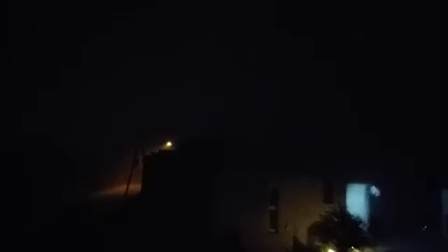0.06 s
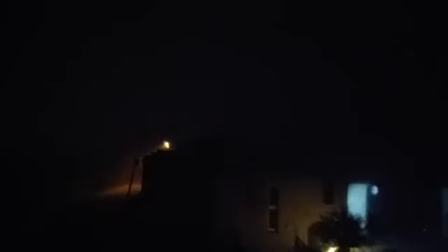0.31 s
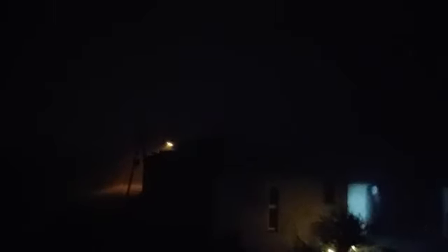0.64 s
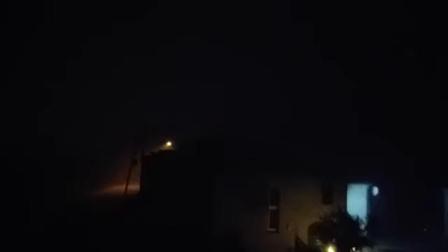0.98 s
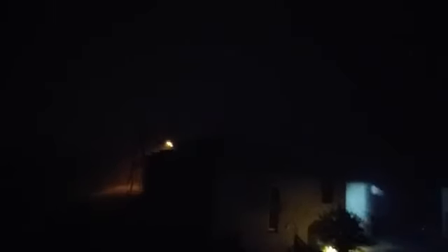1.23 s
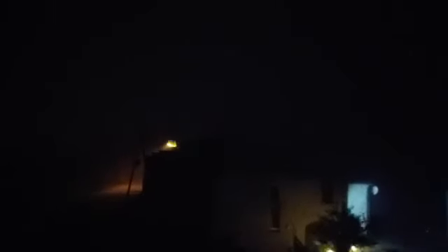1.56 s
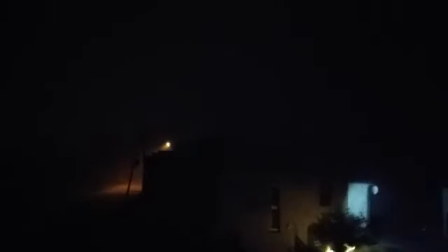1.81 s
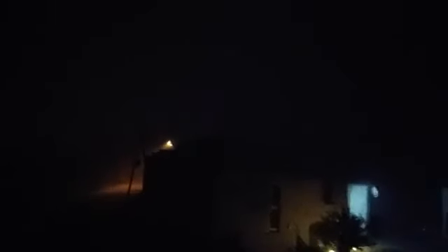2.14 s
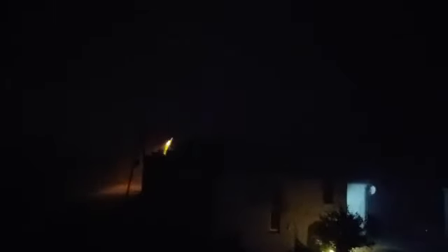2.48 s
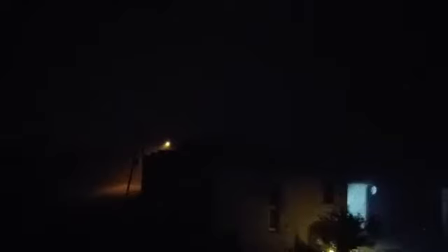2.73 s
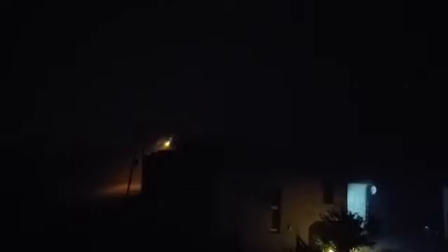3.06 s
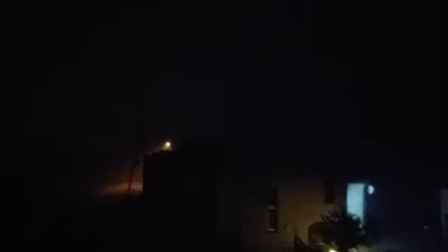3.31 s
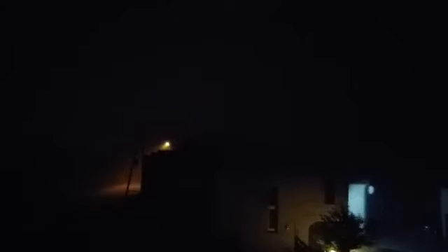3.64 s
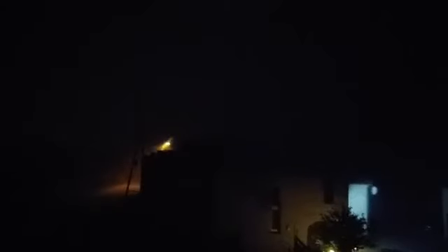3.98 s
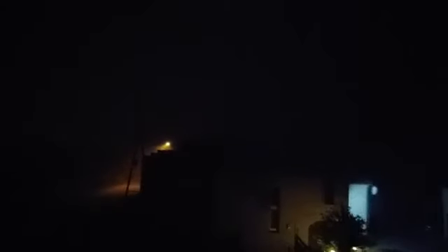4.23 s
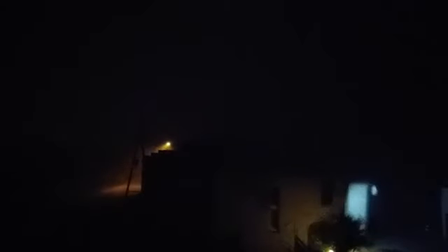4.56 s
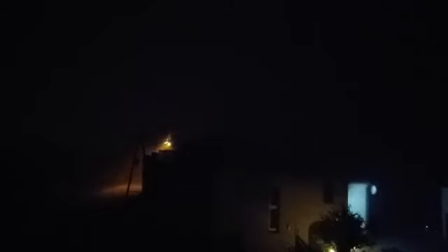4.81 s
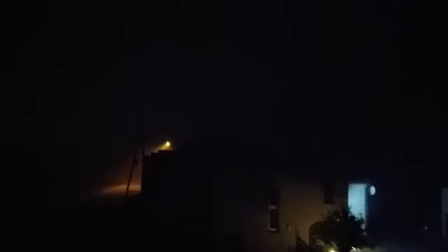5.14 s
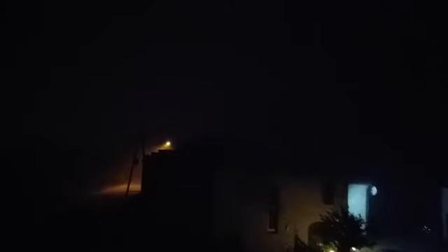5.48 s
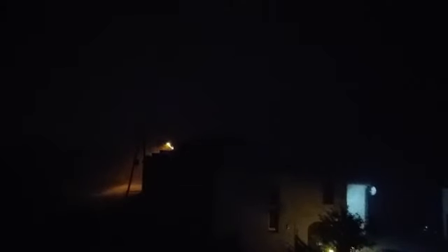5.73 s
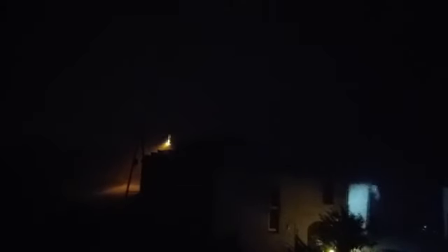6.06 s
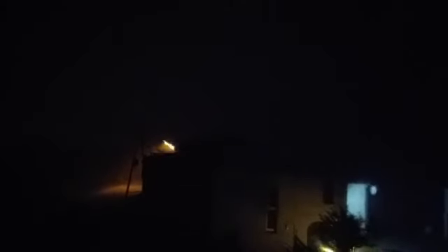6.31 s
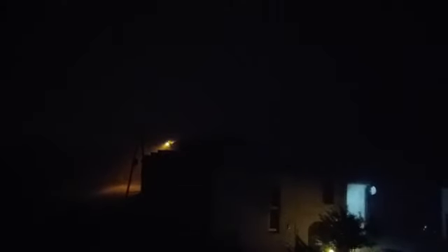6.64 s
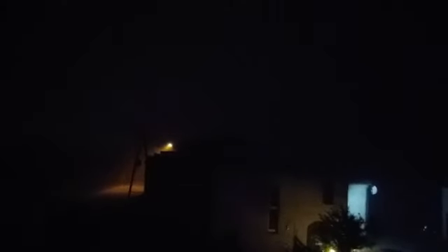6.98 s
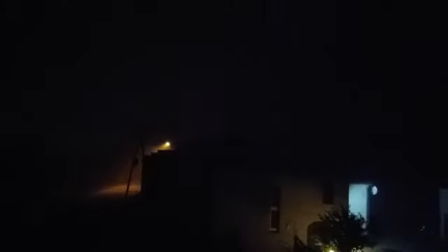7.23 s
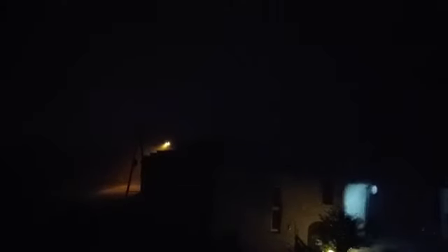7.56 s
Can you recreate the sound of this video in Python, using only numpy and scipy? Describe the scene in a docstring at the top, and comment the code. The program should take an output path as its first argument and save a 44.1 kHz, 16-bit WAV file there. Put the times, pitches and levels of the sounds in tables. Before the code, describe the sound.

Heavy night rain patters and drums on a window, with fat drops knocking on the metal sill and drips plopping into water.

```python
"""Heavy night rain from just behind a window, in a small room. From the start, over a distant wash, small
drops patter, the frame drums and the pane booms; hard drops tick on the glass and fat ones knock on the
metal sill. From 0.4 s drips plop into standing water. Near 3 s the patter thins and the low drumming
and boom drop away, then they build again. From 4.6 s some drops shatter into spray. Near 7 s patter,
drumming and boom dip a second time and return."""
import sys
import numpy as np
from scipy import signal
from scipy.fft import rfft, irfft, next_fast_len
from scipy.io import wavfile
from scipy.ndimage import uniform_filter1d, map_coordinates

SR = 44100
rng = np.random.default_rng(int(sys.argv[2]) if len(sys.argv) > 2 else 0)


def output_pcm(signal):
    """Save a mono or channel-first signal as 16-bit PCM at the path in sys.argv[1].

    Samples are clipped to [-1, 1] before scaling.
    """
    pcm = np.clip(np.atleast_2d(signal).T, -1, 1) * 32767
    wavfile.write(sys.argv[1], SR, np.round(pcm).astype(np.int16))


N = 343980  # 7.8 s


def amp(db):
    """Decibels to gain."""
    return 10 ** (np.asarray(db) / 20)


def unit(x):
    """Scale to rms 1."""
    return x / np.sqrt(np.mean(x ** 2) + 1e-20)


def along(points, hz):
    """Read (Hz, value) points on a log axis."""
    point_hz, values = np.transpose(points)
    return np.interp(np.log(hz + 1), np.log(point_hz + 1), values)


def curve(points):
    """Read (seconds, value) points at every sample."""
    times_s, values = np.transpose(points)
    return np.interp(np.arange(N) / SR, times_s, values)


def add(track, start_s, sound):
    """Mix a sound into the track."""
    part = track[max(round(start_s * SR), 0):][:len(sound)]
    part += sound[:len(part)]


def filtered(x, response):
    """Apply a complex frequency response."""
    size = next_fast_len(len(x) + SR // 2)
    return irfft(rfft(x, size) * response(np.fft.rfftfreq(size, 1 / SR)), size)[:len(x)]


def coloured(x, spectrum, size=4096):
    """Minimum-phase filter from (Hz, dB) points; attacks stay sharp."""
    gain = amp(along(spectrum, np.fft.rfftfreq(size, 1 / SR)))
    cepstrum = irfft(np.log(gain))
    cepstrum[1:size // 2] *= 2
    cepstrum[size // 2 + 1:] = 0
    impulse_response = irfft(np.exp(rfft(cepstrum)))
    return signal.fftconvolve(x, impulse_response)[:len(x)]


def resonate(x, modes, soft_hz):
    """Blows, low-passed at soft_hz, drive (Hz, width Hz, dB) resonances."""
    soft = signal.sosfilt(signal.butter(4, soft_hz, fs=SR, output="sos"), x)
    return filtered(soft, lambda f: sum(amp(db) * 1j * f * width / (hz * hz - f * f + 1j * f * width)
                                        for hz, width, db in modes))


def impacts(per_second, spread_db):
    """Randomly timed impulses of log-normal size."""
    lands = rng.random(N) < per_second / SR
    size = amp(spread_db * np.clip(rng.standard_normal(N), -2, 2))
    return lands * size * rng.choice([-1, 1], N)


def flurries(per_second=9):
    """Quick swells: a smooth curve through random knots."""
    knots = rng.standard_normal(int(N * per_second / SR) + 4)
    return map_coordinates(knots, [np.arange(N) * per_second / SR])


def follow(points, mean_db, db_per_db, flurry_db):
    """Level in dB that tracks a curve's swing about its mean, plus flurries."""
    curve_db = curve(points)
    return mean_db + db_per_db * (curve_db - curve_db.mean()) + flurry_db * flurries()


# Room decay. Each row: frequency in Hz, T60 in seconds.
ROOM_DECAY = [(200, 0.65), (1400, 0.41), (4000, 0.28), (10000, 0.28)]

def room(x):
    """The room's answer: a fresh diffuse tail whose treble dies first."""
    hz, t, noise = signal.stft(rng.standard_normal(SR // 3), SR, nperseg=256)
    decay = amp(-60 * t / along(ROOM_DECAY, hz)[:, None])
    tail = signal.istft(noise * decay, SR, nperseg=256)[1]
    tail *= 1 - np.exp(-np.arange(len(tail)) / SR / 0.00026)
    return signal.fftconvolve(x, tail / np.linalg.norm(tail))[:len(x)]


# Level curve for wash and patter. Each row: time in seconds, relative level in dB.
RAIN_LEVEL = [(0, -47), (1.0, -61), (2.2, -59.5), (2.85, -81.5), (2.95, -58), (3.3, -77.5), (3.75, -70),
              (4.2, -62), (4.4, -62), (6.1, -52), (6.7, -68.5), (7.15, -72), (7.6, -59)]
# Distant wash. Each row: frequency in Hz, relative level in dB.
WASH_SPECTRUM = [(20, -19), (85, -12), (140, -4.5), (480, -23.5), (660, 16.5), (1200, -0.5), (3000, -1.5),
                 (5500, 4.5), (7500, -33), (15000, -23.5)]

def distant_rain():
    """The even wash of rain farther off; its level dips a little with the patter."""
    level_db = follow(RAIN_LEVEL, mean_db=-68, db_per_db=0.34, flurry_db=0.7)
    return amp(level_db) * unit(coloured(rng.standard_normal(N), WASH_SPECTRUM))


# Modes of the metal sill. Each row: frequency in Hz, relative level in dB, T60 in seconds.
SILL_MODES = [(1089, -14.5, 0.034), (1634, -10.5, 0.031), (1835, -8, 0.026), (2419, -9.5, 0.059),
              (2490, -12.5, 0.054), (2587, -11.5, 0.034), (2800, -15.5, 0.055), (3222, -3.5, 0.04),
              (3232, -3, 0.035), (3343, -10, 0.036), (3670, -11.5, 0.043), (4010, -4.5, 0.02),
              (4300, -0.5, 0.014)]

def sill_ring(t, scatter_db):
    """The sill's modes, at strengths set by where the drop lands; sloshing water detunes them."""
    landing = rng.standard_normal((len(SILL_MODES), 2))
    drift_rad = np.cumsum(rng.standard_normal((len(SILL_MODES), len(t))), axis=1) * np.sqrt(70 / SR)
    drift_rad = uniform_filter1d(drift_rad, size=64)
    ring = np.zeros(len(t))
    for (hz, db, t60_s), (size, side), drift in zip(SILL_MODES, landing, drift_rad):
        envelope = amp(db + scatter_db * size - 60 * t / t60_s)
        ring += np.sign(side) * envelope * np.sin(2 * np.pi * hz * t + drift)
    return ring


# Crack of a drop on glass. Each row: frequency in Hz, gain in dB.
CRACK_SPECTRUM = [(300, -24), (1200, -15), (2500, -3.5), (4000, 0.5), (6300, -2.5), (10000, -27.5),
                  (13000, -36), (15500, -84)]

def glass_tick(t, hz, cycles_to_peak, after_t60_s=0.016, crack_t60_s=0.012):
    """A drop hits the glass: a few bright cycles that stop short, a weak after-ring, a faint crack."""
    age = t * hz / max(cycles_to_peak, 0.5)
    burst = age * np.exp((1 - age ** 2) / 2)
    after_ring = (1 - np.exp(-age)) * amp(-8.5 - 60 * t / after_t60_s)
    crack = coloured(rng.standard_normal(len(t)) * amp(-60 * t / crack_t60_s), CRACK_SPECTRUM)
    return (burst + after_ring) * np.sin(2 * np.pi * hz * t) + amp(-2) * crack


# Splash of small drops. Each row: frequency in Hz, relative level in dB.
PATTER_SPECTRUM = [(400, -43.5), (650, -13), (1000, 4), (1500, 0), (2100, -8.5), (3000, -2.5), (4000, -11),
                   (5300, -3), (6300, -9.5), (8000, -20.5), (10000, -31.5), (14000, -48)]

def patter(burst_t60_s=0.017):
    """Many small drops ring the sill and tick on the glass at ten spots, over a finer spray."""
    level_db = follow(RAIN_LEVEL, mean_db=-61.5, db_per_db=0.43, flurry_db=0.32)
    t = np.arange(SR // 8) / SR
    on_sill, on_glass = np.zeros(N), np.zeros(N)
    reaches_glass = rng.random(N) < amp(level_db - level_db.max())  # fewer ticks at lower level
    rise = 1 - np.exp(-t / 0.0008)  # a small drop spreads before it bursts
    for _ in range(10):
        burst = coloured(rng.standard_normal(len(t)) * rise * amp(-60 * t / burst_t60_s), PATTER_SPECTRUM)
        splash = unit(burst) + amp(-3.5) * unit(rise * sill_ring(t, scatter_db=-1.5))
        on_sill += signal.fftconvolve(impacts(per_second=8, spread_db=5.5), splash)[:N]
        tick = glass_tick(t, rng.uniform(4870, 5730), cycles_to_peak=3.1)
        on_glass += signal.fftconvolve(reaches_glass * impacts(per_second=3.5, spread_db=4), tick)[:N]
    spray = coloured(impacts(per_second=1500, spread_db=2), PATTER_SPECTRUM)
    near = amp(level_db) * (amp(-3.5) * unit(on_sill) + amp(-8) * unit(on_glass) + amp(-9) * unit(spray))
    return near + amp(-6.5) * room(near)


# Level curves of the drumming and the boom. Each row: time in seconds, relative level in dB.
DRUM_LEVEL = [(0, -53.5), (1.95, -58), (2.32, -63), (2.62, -63.5), (2.9, -79), (3.06, -84), (3.17, -76),
              (3.33, -85), (3.47, -61), (3.62, -83.5), (3.9, -73), (4.0, -86), (4.13, -65.5), (4.3, -63.5),
              (4.4, -58), (5.75, -56.5), (6.08, -51.5), (6.3, -56.5), (6.68, -57), (7.05, -69.5),
              (7.22, -69.5), (7.36, -72), (7.6, -58)]
BOOM_LEVEL = [(0, -48.5), (1.5, -52), (2.0, -55.5), (2.55, -64.5), (2.8, -76), (2.92, -60.5), (3.55, -58.5),
              (3.76, -69.5), (3.9, -65), (4.4, -57.5), (5.4, -53), (6.35, -51), (6.65, -55.5),
              (7.15, -71.5), (7.5, -58.5), (7.8, -58)]
# Dull thuds on the frame. Each row: frequency in Hz, relative level in dB.
THUD_SPECTRUM = [(25, -25.5), (70, -20.5), (120, -1.5), (260, 3), (500, 2.5), (800, 1.5), (1200, -10),
                 (2000, -9.5), (4000, -18.5), (10000, -120)]
# Modes of frame, pane and wall panel. Each row: frequency in Hz, width in Hz, relative gain in dB.
FRAME_MODES = [(273.5, 14, 18.4), (310, 18, 9.8), (451.6, 8.2, 18.3), (651, 23, 13.7), (753, 60, 3.2)]
PANE_MODES = [(158.6, 3.2, 4), (172.8, 6.2, 7), (205.3, 3.9, 1), (215.2, 6.4, 7)]
PANEL_MODES = [(84, 6.5, 0)]

def drumming():
    """Massed rain drums on the frame and makes the pane and the heavy wall panel boom."""
    drum_db = curve(DRUM_LEVEL) + 1.26 * flurries()
    pane_db = follow(BOOM_LEVEL, mean_db=-61.5, db_per_db=0.92, flurry_db=1.9)
    panel_db = follow(BOOM_LEVEL, mean_db=-70, db_per_db=0.57, flurry_db=0.99)
    thuds = unit(coloured(impacts(per_second=120, spread_db=5), THUD_SPECTRUM))
    frame = unit(resonate(impacts(per_second=90, spread_db=0.5), FRAME_MODES, soft_hz=1240))
    pane = unit(resonate(impacts(per_second=130, spread_db=0.5), PANE_MODES, soft_hz=242))
    panel = unit(resonate(impacts(per_second=1100, spread_db=0), PANEL_MODES, soft_hz=160))
    drum = amp(-6) * thuds + amp(-5) * room(thuds) + amp(-6) * frame
    return amp(drum_db) * drum + amp(pane_db) * pane + amp(panel_db) * panel


# Hard drops on the glass. Each row: start in seconds, level in dB, pitch in Hz, room gain in dB,
# cycles to the ring's peak.
GLASS_DROPS = [(0.095, -30.5, 4740, -11, 0.42), (0.287, -10.5, 4860, -11, 2.1),
               (0.319, -30.5, 5100, 3, 0.6), (0.336, -32.5, 5600, -14, 2),
               (1.1823, -31.5, 4540, -0.5, 0.95), (1.328, -20.5, 5030, 2.5, 1.35),
               (1.4816, -25.5, 5600, -4, 1.6), (1.89, -21, 5120, -11.5, 6.1),
               (2.6911, -41.5, 5130, -1, 1.3), (2.786, -36.5, 5520, -3, 1.7), (3.3527, -28, 4840, -7, 3.2),
               (3.391, -36, 4670, -11, 1.6), (3.467, -31.5, 5480, -6.5, 2.5), (3.667, -37, 5050, -9, 4.6),
               (3.828, -40, 5600, 3, 3), (3.8431, -29.5, 5730, -18, 4.3), (3.861, -33, 5060, 4.5, 1.4),
               (4.0771, -38, 5260, -1, 2.5), (4.1535, -45, 5050, -17, 3.6), (4.361, -28, 4550, -5, 1.5),
               (4.4264, -36.5, 5200, -8, 1.8), (4.569, -24, 4740, -9.5, 3.2), (4.7816, -36.5, 5200, 3, 1.7),
               (5.2733, -36.5, 5730, -9, 2.6), (5.931, -31, 5100, -3.5, 2.3), (5.997, -27.5, 4990, -16, 6),
               (6.049, -30, 5450, -6, 2.5), (6.6642, -30.5, 5630, -8.5, 2.1), (6.801, -44, 5900, -5, 2.2),
               (7.1211, -40.5, 5700, -12, 2.6), (7.758, -34.5, 5600, -5, 4.7), (7.794, -33, 5500, 2, 6.2)]

def ticks():
    """The hardest drops tick on the glass, each with its own room tail."""
    out, t = np.zeros(N), np.arange(SR // 3) / SR
    for start_s, db, hz, room_db, cycles_to_peak in GLASS_DROPS:
        tick = glass_tick(t, hz, cycles_to_peak)
        add(out, start_s, amp(db) * (tick + amp(room_db) * room(tick)))
    return out


# Splash of a fat drop. Each row: frequency in Hz, relative level in dB.
SPLASH_SPECTRUM = [(100, -67), (400, -7.5), (1200, -3.5), (2500, -1.5), (4000, -1), (5400, 5.5), (6200, -2),
                   (7500, -12.5), (10000, -26), (13000, -32), (15500, -88)]

def sill_knock(ring_db, splash_db, splash_t60_s=0.03, slap_t60_s=0.0087, ring_attack_s=0.0014):
    """A drop slaps the sill and bursts within milliseconds while the ring builds under it."""
    t = np.arange(SR // 3) / SR
    envelope = amp(-60 * t / splash_t60_s) + amp(-1.5 - 60 * t / slap_t60_s)
    burst = coloured(rng.standard_normal(len(t)) * envelope, SPLASH_SPECTRUM)
    modes = sill_ring(t, scatter_db=3) * (1 - np.exp(-t / ring_attack_s))
    splash = amp(splash_db) * burst / np.linalg.norm(burst)
    ring = amp(ring_db) * modes / np.linalg.norm(modes)
    return splash + ring + amp(-0.5) * room(splash + amp(-10) * ring)


# Fat drops on the sill. Each row: start in seconds, ring energy in dB, splash energy in dB.
SILL_DROPS = [(0.247, -17, -21), (0.2615, -16, -20.5), (0.4288, -19, -34), (0.529, -13, -17.5),
              (0.575, -39, -21), (0.5885, -17, -25), (0.715, -30, -24), (0.791, -19, -15),
              (0.855, -23, -25), (0.9827, -24, -20), (1.069, -21.5, -19.5), (1.108, -20.5, -23),
              (1.464, -14.5, -12.5), (1.589, -22, -19.5), (1.762, -22, -28), (1.796, -21.5, -16.5),
              (2.0288, -10, -13), (2.262, -22.5, -29.5), (2.3686, -21, -19), (2.516, -50, -17.5),
              (2.634, -43, -26), (3.0965, -29, -41), (3.154, -47, -30.5), (3.192, -29.5, -29),
              (3.415, -9, -13.5), (3.648, -36, -29.5), (3.843, -23, -27), (3.8843, -24.5, -27),
              (4.2604, -11.5, -21.5), (4.3706, -14, -19), (4.391, -26, -22), (4.459, -23.5, -26),
              (4.55, -20.5, -22), (4.682, -31, -31), (4.7194, -19, -25), (4.916, -49, -26),
              (4.995, -27.5, -28), (5.032, -21.5, -32), (5.14, -25.5, -30), (5.1625, -25, -40),
              (5.212, -26, -51), (5.307, -27, -26), (5.378, -20, -27), (5.4269, -30, -38.5),
              (5.52, -21, -41), (5.587, -22, -33), (5.612, -25, -44), (5.647, -21, -20), (5.7229, -28, -39),
              (5.758, -42, -25), (5.812, -22.5, -25.5), (5.9244, -20, -21), (6.0548, -23, -17.5),
              (6.083, -27, -29), (6.128, -44, -24), (6.179, -27, -20), (6.2488, -14, -19),
              (6.559, -43, -27.5), (6.583, -10.5, -14.5), (6.624, -37, -25), (6.755, -22, -25),
              (7.145, -39, -53), (7.2225, -33, -23), (7.461, -25.5, -30.5), (7.554, -23, -25.5),
              (7.615, -26, -25.5), (7.701, -31, -34)]

def knocks(push_over_ring_db=10.5):
    """Fat drops knock on the sill and push the window, so pane and frame thump."""
    on_sill, pushes = np.zeros(N), np.zeros(N)
    for start_s, ring_db, splash_db in SILL_DROPS:
        add(on_sill, start_s, sill_knock(ring_db, splash_db))
        add(pushes, start_s, [amp(ring_db + push_over_ring_db)])
    pane = resonate(pushes, PANE_MODES, soft_hz=257)
    frame = resonate(pushes, FRAME_MODES, soft_hz=700)
    return on_sill + pane + amp(-24.5) * frame


# Drips into standing water. Each row: start in seconds, level in dB, final pitch in Hz.
DRIPS = [(0.432, -35.5, 770), (0.545, -37.5, 775), (1.362, -30.5, 793), (2.494, -39.5, 804),
         (2.899, -52.5, 770), (4.055, -42.5, 835), (5.364, -35, 844), (6.897, -46.5, 796),
         (7.656, -38, 646)]

def plops(attack_s=0.002, t60_s=0.03):
    """A drip slaps the water and traps a bubble, which rings briefly and rises in pitch."""
    out, t = np.zeros(N), np.arange(SR // 3) / SR
    envelope = (1 - np.exp(-t / attack_s)) * amp(-60 * t / t60_s)
    for start_s, db, hz in DRIPS:
        bubble_hz = hz * (1 - 0.05 * np.exp(-t / 0.004))
        bubble = np.sin(2 * np.pi * np.cumsum(bubble_hz) / SR)
        slap_modes = [(hz, 250, 0), (2.2 * hz, 300, 0)]
        slap = unit(resonate(rng.standard_normal(len(t)), slap_modes, soft_hz=2200))
        plop = (bubble + amp(-6) * slap) * envelope
        add(out, start_s, amp(db) * (plop + amp(-4.5) * room(plop)))
    return out


# Drops that shatter. Each row: start in seconds, energy in dB.
SHATTERING_DROPS = [(4.624, -26), (5.14, -28.5), (5.813, -36), (5.878, -31), (6.17, -34), (6.268, -25),
                    (7.614, -37)]
# Their droplets. Each row: frequency in Hz, relative level in dB.
DROPLET_SPECTRUM = [(2500, -12), (6000, 5), (8500, -16), (11500, -17.5), (13000, -34)]

def spatters(t60_s=0.16):
    """A drop shatters on the wet sill and throws a short shower of tiny droplets."""
    out, t = np.zeros(N), np.arange(SR // 3) / SR
    for start_s, db in SHATTERING_DROPS:
        droplets = impacts(per_second=900, spread_db=4)[:len(t)]
        shower = coloured(droplets * amp(-60 * t / t60_s), DROPLET_SPECTRUM)
        add(out, start_s, amp(db) * shower / np.linalg.norm(shower))
    return out


def scene():
    """Single drops over the continuous rain, in one channel."""
    single_drops = knocks() + ticks() + plops() + spatters()
    return (single_drops + patter() + drumming() + distant_rain())[None]


def record(dry):
    """Brick-wall low-pass."""
    top_hz = 15550
    return np.array([filtered(channel, lambda hz: hz < top_hz) for channel in dry])


dry = scene()
out = record(dry)
output_pcm(out)
```